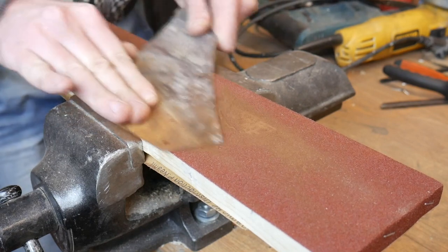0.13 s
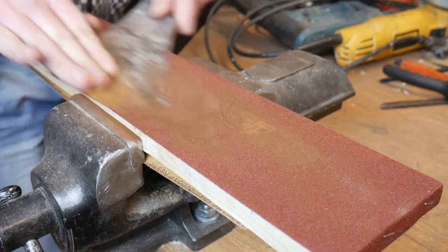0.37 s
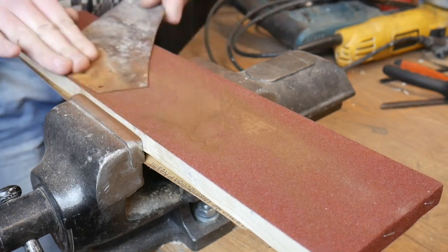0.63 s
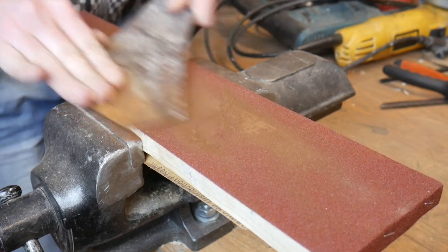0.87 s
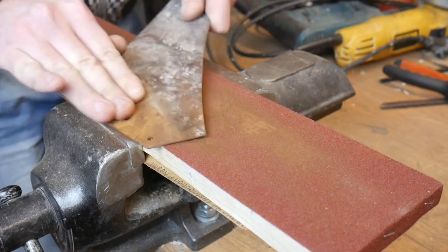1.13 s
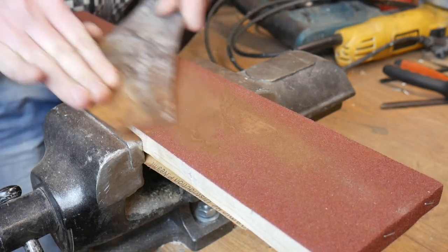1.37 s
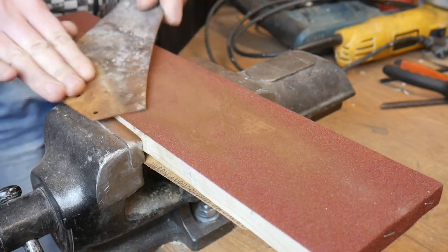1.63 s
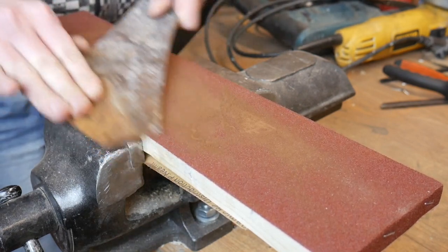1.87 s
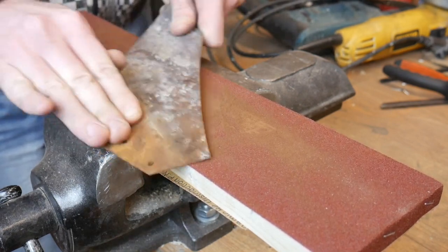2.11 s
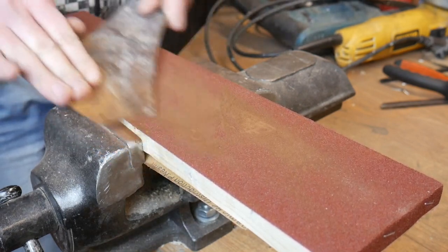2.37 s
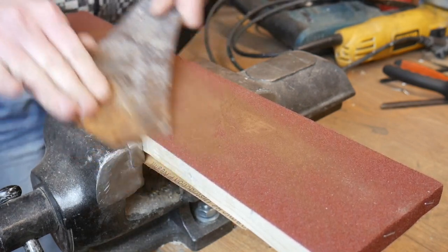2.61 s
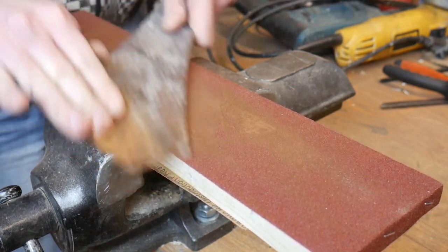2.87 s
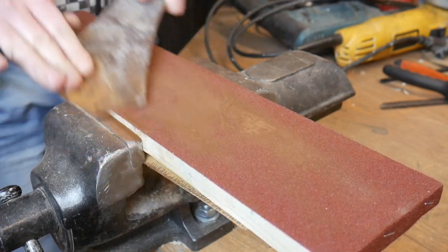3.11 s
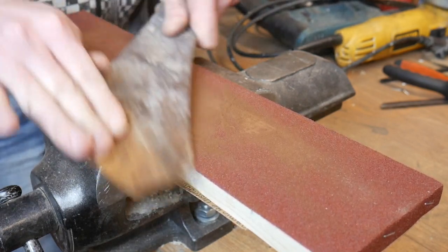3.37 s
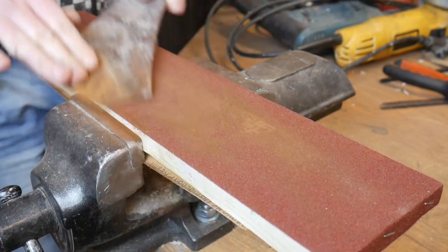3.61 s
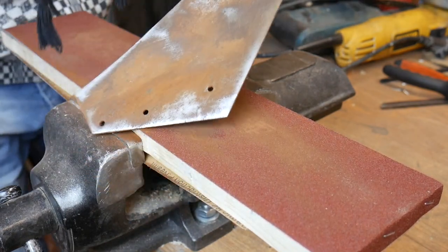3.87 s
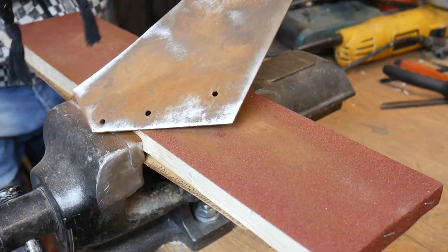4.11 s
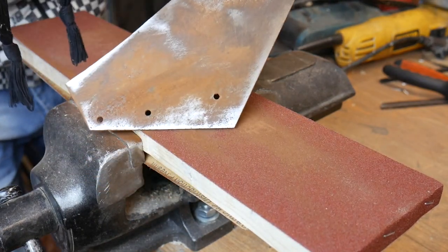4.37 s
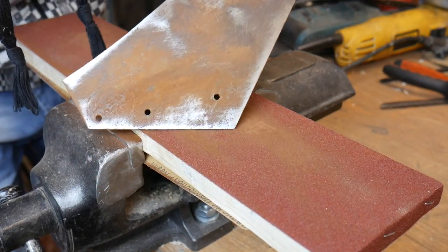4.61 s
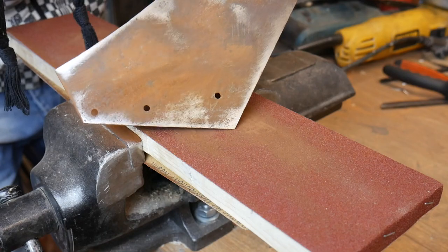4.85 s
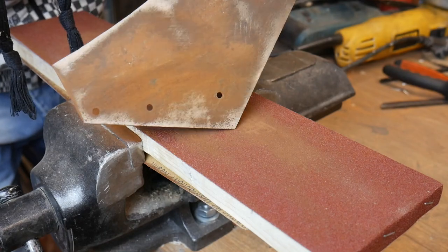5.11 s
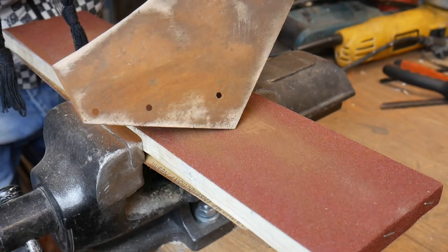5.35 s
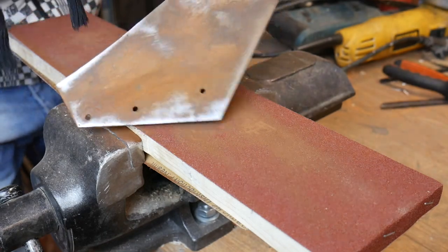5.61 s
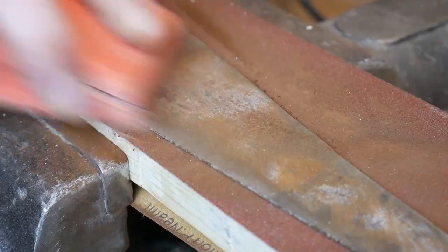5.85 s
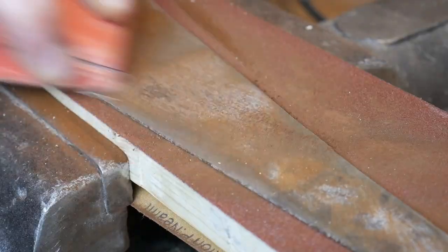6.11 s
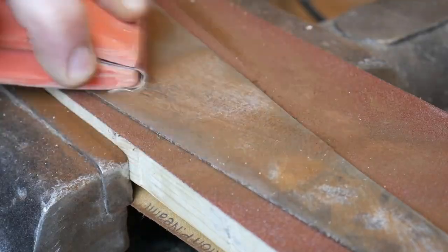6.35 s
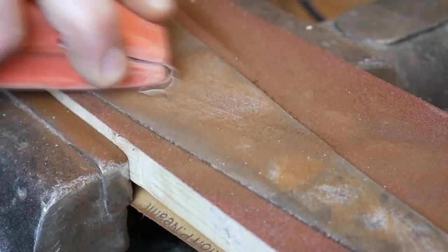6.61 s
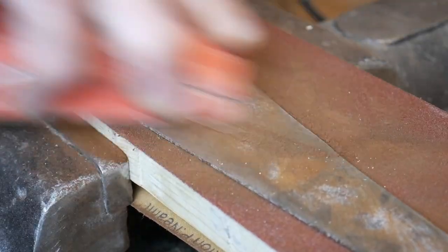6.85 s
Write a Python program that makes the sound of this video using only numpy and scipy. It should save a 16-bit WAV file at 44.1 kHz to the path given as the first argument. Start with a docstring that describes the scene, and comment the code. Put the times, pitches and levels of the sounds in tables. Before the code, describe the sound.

Close up in a small workshop, a rusty saw blade is rubbed quickly to and fro on a sandpaper board, a bright dry rasp with thin steel ring and woody resonance. It breaks off abruptly into quiet handling, a few soft metallic taps and a faint buzz. Just as suddenly a rubber sanding block scrubs the blade in fast, dense strokes until the end. Wide stereo, steady low microphone noise.

```python
"""A rusty saw blade is pushed to and fro over a sandpaper board in a vise: grit clicks ring thin steel and board.
The rasp breaks off into a quiet spell: filtered noise for hands and sleeves, decaying sines for taps of the
lifted blade, and a mains buzz of knocks and rattle that comes and goes.
As abruptly, a rubber sanding block scrubs the blade, again as resonant grit clicks.
A rocking bench and dense stereo reflections lie over steady microphone noise, stronger at the sides."""
import sys
import numpy as np
from scipy import signal
from scipy.fft import rfft, irfft, next_fast_len
from scipy.io import wavfile
from scipy.ndimage import uniform_filter1d

SR = 44100
rng = np.random.default_rng(int(sys.argv[2]) if len(sys.argv) > 2 else 0)


def pcm_store(signal):
    """Save signal as 16-bit PCM."""
    levels = np.round(np.clip(np.atleast_2d(signal), -1, 1) * 32767)
    wavfile.write(sys.argv[1], SR, levels.astype(np.int16).T)


def amplitude_ratio(level_db):
    """Convert a level in decibels to the matching linear amplitude (field) ratio."""
    exponent = np.asarray(level_db, float) / 20
    return 10 ** exponent


N = 307377
TIME = np.arange(N) / SR
SIZE = next_fast_len(N + SR)   # room for filter tails
HZ = np.maximum(np.fft.rfftfreq(SIZE, 1 / SR), 1)
QUIET_FROM_S, QUIET_TO_S = 3.806, 5.766


# blade strokes, pushes and pulls in turn; levels before the trim, lean is the rise from middle to end:
# turn_s, top_db, lean_db, steel_freedom_db, board_freedom_db
BLADE_STROKES = [(-0.09, -22, 4, -5.5, -9), (0.074, -19, 0, -6.5, 0), (0.242, -20.5, -1.5, -4.5, -9),
                 (0.393, -19.5, -3, -2, -11), (0.545, -21.5, 1.5, -13, -8), (0.712, -19.5, 0, -3, -11.5),
                 (0.873, -20.5, 2, 2.5, -7), (1.033, -21, 0, 3, -5.5), (1.207, -21.5, -1.5, 4, 4.5),
                 (1.368, -20, 0.5, 1, 6), (1.534, -21.5, 0, 3, 7.5), (1.692, -19.5, 0.5, -0.5, 9),
                 (1.859, -20.5, 0, 4.5, 10.5), (2.034, -19, 1, 1, 4.5), (2.205, -20, -2.5, 1.5, 9.5),
                 (2.38, -18.5, 3, 2, 4), (2.581, -20, 0, -1.5, 5.5), (2.808, -19, 1.5, 1.5, -4.5),
                 (3.019, -21.5, 1.5, 3.5, 3.5), (3.268, -19.5, 0.5, 5, -1), (3.51, -20, 1.5, 1.5, 2.5),
                 (3.753, -21, -1.5, 0.5, 3)]
# course of a push and of a pull, added to the stroke: share_of_stroke, level_db, steel_db, board_db
BLADE_PUSH = [(0, -22.5, 0, 1.5), (.1, -10, 1.5, 0.5), (.2, -4.5, 2.5, 2), (.39, -1.5, -5.5, -4),
              (.62, -1, 3, -1.5), (.85, -8.5, 2, 3)]
BLADE_PULL = [(0, -22, 0.5, 2.5), (.1, -7.5, 3, 0.5), (.2, -1, 5.5, 5), (0.389, -0.5, -5.5, -6),
              (.62, -2.5, -4.5, 2), (.85, -12, 4, 6.5)]
# colour of the blade's rasp: pitch_hz, relative_level_db
BLADE_RASP = [(53, -67), (90, -37), (461, -25.5), (878, -11), (1040, -15), (1500, -8.5), (2210, -4),
              (2920, -2.5), (9960, -6.5), (15300, -20)]
# modes of the steel and of the board above the rasp: pitch_hz, width_hz, level_db, share_of_grip_change
BLADE_STEEL = [(1964, 71, 2.5, 1.1), (2154, 40, 8, 1.56), (2234, 57, 0.5, 1.1), (3220, 59, 3, 0.28),
               (3390, 20, -1.5, 0.25), (3765, 40, 0.5, .3)]
BLADE_BOARD = [(188, 14, 6.5, .2), (308, 32, 11, 0.22), (553, 49, 2.8, 1.2), (763.4, 12, 6.8, 0.28),
               (875.7, 41, 9.2, 0.9), (921, 19, 1.5, 0.78), (1302, 20, 6.6, 0.33)]


def blade_on_board():
    """The saw blade rubs over the sandpaper board, which rings along with the thin steel."""
    return sanding(BLADE_STROKES, 4.004, (BLADE_PUSH, BLADE_PULL), BLADE_RASP, BLADE_STEEL, BLADE_BOARD,
                   per_s=9000.0, spread_db=1.0, dull=0.56, steady=0.92,
                   patch_db=-9.5, rough_db=0.36, trim_db=-3.5)


# block strokes, pulls and pushes in turn; levels before the trim, lean is the rise from middle to end:
# turn_s, top_db, lean_db, steel_freedom_db, board_freedom_db
BLOCK_STROKES = [(5.72, -21, -2, 0, -8.5), (5.864, -21, 0.32, 0.27, 0), (6.012, -21, -0.25, 0, -6),
                 (6.152, -20, -1.9, -0.44, 0.5), (6.301, -20.5, -0.9, -2.2, -1),
                 (6.436, -20.5, 0.14, -1.5, 2.5), (6.571, -19.5, 1, 0.17, 2),
                 (6.694, -19.5, 0.69, 0.18, -0.5), (6.846, -18.5, 0.52, 0.58, -0.5)]
# course of a pull and of a push, added to the stroke: share_of_stroke, level_db, steel_db, board_db
BLOCK_PULL = [(0, -15, 0, 0), (.09, -4.5, 0, 0), (.19, -0.5, .3, -0.27), (.39, -1, .4, -.2),
              (.62, -4, -.3, .2), (.85, -9, -.4, 0.26)]
BLOCK_PUSH = [(0, -19.5, 0, 0), (.09, -10, 0, 2), (.19, -5, -1, 2.3), (.39, -1.5, 0, -0.11),
              (.62, 0, .3, -1.2), (.85, -4.5, .4, -0.19)]
# colour of the block's rasp: pitch_hz, relative_level_db
BLOCK_RASP = [(53, -50), (90, -26.5), (300, -18.5), (481, -21.5), (772, -10), (1410, -8.5), (2120, -3),
              (4310, -1.5), (10200, -5.5), (15300, -16)]
# modes of the steel and of the board above the rasp: pitch_hz, width_hz, level_db, share_of_grip_change
BLOCK_STEEL = [(2160, 53, -1.5, 2.1)]
BLOCK_BOARD = [(209, 16, 2.7, 0.18), (301, 71, 3.2, 0.66), (579, 115, 3.0, 0.54), (752, 37, 9.8, 1.7),
               (1156, 11, 2, .3)]


def block_on_blade():
    """The rubber block scrubs the blade with denser, more uneven grit."""
    return sanding(BLOCK_STROKES, 6.99, (BLOCK_PULL, BLOCK_PUSH), BLOCK_RASP, BLOCK_STEEL, BLOCK_BOARD,
                   per_s=12000.0, spread_db=2.0, dull=0.095, steady=0.75,
                   patch_db=-7.0, rough_db=0.03, trim_db=-3.0)


def sanding(strokes, end_s, shapes, rasp, steel, board, per_s, spread_db, dull, steady,
            patch_db, rough_db, trim_db):
    """Grit clicks excite the rasp, the free steel, the board and many damped plate modes of wavering strength."""
    level_db, steel_db, board_db, way = stroked(strokes, end_s, shapes)
    level_db = uniform_filter1d(level_db, int(0.011 * SR))   # the hand's inertia rounds the turns
    slow_db = level_db - level_db.max()

    grains = colour(grit(per_s, spread_db), rasp) * amplitude_ratio(rough_db * drift(25.0))
    presence = cut(cut(grains, 2400, "high", order=4), 7000, "low", order=4)
    grains /= np.std(presence)
    low = cut(grains, 710, "low")
    high = cut(grains, 5000, "high")

    # slow rubbing and every second stroke are duller
    treble_db = dull * slow_db + 0.88 * way + 0.63 * drift(7.0)
    # the board rumbles on through the turns
    rumble_db = 0.14 * board_db - steady * slow_db
    rubbed = grains + (amplitude_ratio(treble_db) - 1) * high + (amplitude_ratio(rumble_db) - 1) * low

    plate_modes_hz = np.geomspace(1000, 13000, 44) * rng.uniform(0.97, 1.03, 44)
    for hz in plate_modes_hz:
        rubbed += resonate(grains * amplitude_ratio(patch_db + 6 * drift(9)), hz, 25 + 0.008 * hz)

    push = amplitude_ratio(level_db + trim_db)
    steel_ring = gripped(grains * push * amplitude_ratio(0.22 * slow_db), steel, steel_db, waver_db=4.5)
    board_ring = gripped(grains * push, board, board_db, waver_db=4.0)
    return rubbed * push + steel_ring + board_ring


def stroked(strokes, end_s, shapes):
    """Level, steel and board freedom and direction along the strokes, which take the two shapes in turn."""
    turns, top_db, lean_db, steel_db, board_db = np.array(strokes).T[:, :, None]
    which = np.arange(len(strokes)) % 2
    share, level, steel, board = np.moveaxis(np.array(shapes)[which], 2, 0)
    lengths = np.diff(np.append(turns, end_s))[:, None]   # end_s is where the last stroke would turn
    s = turns + lengths * share
    way = 1 - 2 * which[:, None] + 0 * share
    columns = top_db + level + lean_db * (2 * share - 1), steel_db + steel, board_db + board, way
    return [np.interp(TIME, s.ravel(), c.ravel()) for c in columns]


def grit(per_s, spread_db):
    """Grains catch and let go at random, a few much harder than the rest."""
    sizes = amplitude_ratio(spread_db * np.minimum(rng.exponential(1, N), 5)) * rng.choice([-1, 1], N)
    caught = rng.random(N) < per_s / SR
    return rms_one(sizes * caught)


def gripped(x, modes, grip_db, waver_db):
    """Modes that the hands damp or set free, each wavering a little on its own."""
    out = 0
    for hz, width, db, follow in modes:
        gain_db = db + follow * grip_db + waver_db * drift(9.9)
        out = out + resonate(x * amplitude_ratio(gain_db), hz, width)
    return out


# the blade touches the board or vise: start_s, tick_db, ring_db, tilt_db_per_octave, share_of_free_ring_time
TAPS = [(3.919, -42, -45.5, 1.5, 0.62), (4.114, -60, -55, -8, 0.33), (4.189, -51, -50, 0, 0.24),
        (4.523, -45, -67, -6.5, 0.42), (4.592, -52, -80, 0.1, .4), (5.47, -85, -80, -10.5, 1.2),
        (5.566, -50, -60.5, -3.5, 0.69), (5.588, -56, -54.5, 37, 1.1)]
# modes of the free blade: pitch_hz, level_db, t60_s
FREE_BLADE = [(1135, 2, 0.66), (1580, -15, 0.36), (858, 1, 0.27), (302, -1, 0.25)]


def taps():
    """A short scratchy tick, and the blade rings as long as the fingers let it."""
    rows = np.array(TAPS)
    starts = (rows[:, 0] * SR).astype(int)
    ticks = np.full(N, 1e-18)
    ticks[starts] = amplitude_ratio(rows[:, 1])
    fade = signal.lfilter([1], [1, -np.exp(-1 / (0.008 * SR))], ticks)
    out = uniform_filter1d(fade, int(0.0027 * SR)) * rms_one(colour(rng.standard_normal(N), HISS))
    for start, (s, tick_db, ring_db, tilt_db, free) in zip(starts, rows):
        t = TIME[:min(SR // 2, N - start)]
        onset = 1 - np.exp(-t / 0.0051)
        for hz, level_db, t60 in FREE_BLADE:
            tilted_db = tilt_db * np.log2(hz / FREE_BLADE[0][0])
            gain_db = ring_db + level_db + tilted_db - 60 * t / (t60 * free)
            out[start:start + len(t)] += amplitude_ratio(gain_db) * onset * np.sin(2 * np.pi * hz * t)
    return out


# steady hold of the blade, before the flutter: time_s, hiss_db, wobble_db
HANDLING = [(3.83, -53, -71), (4.04, -54, -67), (4.2, -55.5, -61), (4.41, -66, -77), (4.65, -68.5, -73.5),
            (4.72, -74, -74), (5.545, -78.5, -87)]
# the fingers take a new hold, before the flutter: time_s, hiss_db, wobble_db
GRABS = [(3.925, -49.5, -46.5), (4.088, -51, -53), (4.115, -54, -46.5), (4.16, -54.5, -58),
         (4.195, -65, -58), (4.305, -56, -51), (4.455, -64, -81), (4.575, -63, -80), (5.585, -52, -67),
         (5.645, -59.5, -49.5), (5.70, -72, -64)]
# colour of skin and sleeves, and of the tap ticks: pitch_hz, relative_level_db
HISS = [(530, -17.5), (900, -2.5), (1040, -17.5), (1140, -5), (1280, -6), (7600, -7.5), (9640, -14.5),
        (15300, -27.5)]
# resonances of the held steel in the hiss: pitch_hz, width_hz, level_db
SHIMMER = [(2560, 120, -2.5), (4170, 300, -9.5), (9900, 720, 3.5)]
# low modes of the wobbling steel: pitch_hz, width_hz, relative_level_db
WOBBLE = [(352, 140, -2.5), (473, 86, 5), (580, 64, -9), (853, 51, -8)]


def handling():
    """Sleeves and skin hiss dully, each new hold scuffs brighter, and the steel wobbles low."""
    rise_s, scuff_fall_s, wobble_fall_s = 0.0062, 0.026, 0.03
    slide, shake = amplitude_ratio(np.array(in_time(HANDLING)))
    scuff = swells(GRABS, rise_s, scuff_fall_s)[0]
    shake = shake + swells(GRABS, rise_s, wobble_fall_s)[1]
    hiss = rms_one(colour(grit(9000.0, 2.0), HISS))
    hiss += body(hiss, SHIMMER)
    dull = cut(hiss, 7300, "low")
    bright = hiss + amplitude_ratio(1.5) * cut(hiss, 7200, "high")
    wobble = rms_one(body(cut(rng.standard_normal(N), 1200, "low"), WOBBLE))
    rubbing = (dull * slide + bright * scuff) * amplitude_ratio(1.7 * drift(30.0))
    return rubbing + wobble * shake * amplitude_ratio(1.7 * drift(25.0))


# the buzz comes and goes, silent outside these times: time_s, level_db
BUZZ = [(4.3, -71.5), (4.65, -69.5), (5.09, -71.5), (5.25, -90)]
# modes of the loose part, the first knocked, the others rattled: pitch_hz, width_hz, level_db
BUZZ_BOX = [(1330, 91, -5.5), (2680, 170, 4), (3060, 180, -6)]


def buzz():
    """Once a mains cycle something loose is knocked almost evenly; its higher modes also rattle."""
    mains_hz, first_s = 50.04, 4.317
    cycle = (TIME - first_s) * mains_hz
    strengths = amplitude_ratio(rng.normal(0, 1.5, int(N / SR * mains_hz) + 2))
    strength = strengths[np.clip(cycle.astype(int), 0, None)]
    knock = strength * (np.diff(np.floor(cycle), prepend=cycle[0]) > 0.5)
    rattle = strength ** 2 * 0.076 * np.exp(-(cycle % 1) / 0.21) * rng.standard_normal(N)
    struck = resonate(knock, BUZZ_BOX[0][0], 400) * 3 + 1e-18
    sound = body(struck, BUZZ_BOX[:1]) + body(rattle, BUZZ_BOX[1:])
    on = (TIME > BUZZ[0][0]) & (TIME < BUZZ[-1][0])
    return on * amplitude_ratio(in_time(BUZZ)[0]) * rms_one(cut(sound, 3650, "low", order=4))


# hard turns and set-downs jolt the bench: time_s, level_db
JOLTS = [(0.28, -59), (0.75, -55), (1.2, -54), (1.9, -62), (2.07, -65), (2.24, -57), (2.85, -59),
         (3.96, -59), (4.2, -70.5), (4.58, -82), (5.91, -55), (6.47, -57), (6.76, -55)]


def bench():
    """The bench rocks at its low resonance, while sanding goes on and about each jolt."""
    pitch_hz, width_hz = 67.0, 8.0
    sanded_db, still_db = -66.5, -96
    once = resonate(rng.standard_normal(N), pitch_hz, width_hz)
    rocking = rms_one(resonate(once, pitch_hz, 4.7 * width_hz))
    still = (TIME >= QUIET_FROM_S) & (TIME < QUIET_TO_S)
    gain = amplitude_ratio(np.where(still, still_db, sanded_db)) + swells(JOLTS, rise_s=0.054, fall_s=0.094)[0]
    return gain * rocking


def workshop(x, t60):
    """Dense reflections: two noise tails of unit energy that trade places as hands and steel move about."""
    tails = rng.standard_normal((2, SR // 2)) * amplitude_ratio(-60 * np.arange(SR // 2) / SR / t60)
    tails /= np.linalg.norm(tails, axis=1, keepdims=True)
    turn = 2 * np.pi * 1.3 * TIME + 2 * drift(2)
    moved = x * np.array([np.cos(turn), np.sin(turn)])
    return irfft(rfft(moved, SIZE) * rfft(tails, SIZE), SIZE)[:, :N].sum(axis=0)


# width of the reflections, before each passage's own width gain: pitch_hz, side_level_db
WIDTH = [(60, -8), (130, -5.5), (290, -11.5), (640, -9), (1410, -7), (3100, -12.5), (6820, -22.5),
         (15000, 0)]


def side_reflections(x, wide_db):
    """Short reflections that reach the two ears in opposite phase widen the image."""
    return amplitude_ratio(wide_db) * colour(workshop(x, t60=0.12), WIDTH)


# colour of the microphone noise in the centre and at the sides: pitch_hz, relative_level_db
NOISE_MID = [(18, -41.5), (30, -17), (140, -13), (202, -5), (307, -8), (332, -9), (546, -10), (2020, -17),
             (15500, -20)]
NOISE_SIDE = [(18, -53), (30, -20.5), (341, -5.5), (575, -10), (709, -11.5), (787, -12), (3150, -29),
              (4090, -28.5), (15500, -42)]


def mic_noise():
    """Steady coloured microphone noise, one for the centre and a stronger one for the sides."""
    mid = amplitude_ratio(-70) * rms_one(colour(rng.standard_normal(N), NOISE_MID))
    side = amplitude_ratio(-62.5) * rms_one(colour(rng.standard_normal(N), NOISE_SIDE))
    return mid, side


# balance of the centre: pitch_hz, left_minus_right_db
LEAN = [(300, .8), (800, .9), (2400, -1.6), (4400, -.2), (8000, -.1), (15000, -1.3)]


def left_right(mid, side):
    """The centre leans left or right by pitch; the sides go in opposite phase to the two channels."""
    lean = np.array(LEAN) * [1, 0.5]   # half the difference to each channel
    return np.array([colour(mid, lean) + side, colour(mid, lean * [1, -1]) - side])


def rms_one(x):
    """Scale to rms 1."""
    return x / np.sqrt(np.mean(x ** 2) + 1e-20)


def in_time(rows):
    """Columns of a table, one value a sample."""
    s, *columns = np.transpose(rows)
    return [np.interp(TIME, s, c) for c in columns]


def swells(rows, rise_s, fall_s):
    """Each event swells and dies exponentially about its time; one gain a sample for each dB column."""
    s, *columns = np.transpose(rows)
    late = TIME[::32, None] - s
    shape = np.exp(np.where(late < 0, late / rise_s, -late / fall_s))
    return [np.interp(TIME, TIME[::32], shape @ amplitude_ratio(db)) for db in columns]


def drift(rate_hz):
    """Slow chance, spread 1."""
    r = np.exp(-80 * np.pi * rate_hz / SR)   # computed every 40th sample
    slow = signal.lfilter([1], [1, -2 * r, r * r], rng.standard_normal(N // 40 + 2002))[2000:]
    return np.interp(np.arange(N) / 40, np.arange(len(slow)), rms_one(slow))


def at_hz(points, hz):
    """A spectrum read on a log axis."""
    pitch_hz, level_db = np.array(points).T
    return np.interp(np.log(hz), np.log(np.maximum(pitch_hz, 1)), level_db)


def colour(x, points):
    """Filter by a spectrum in dB."""
    return irfft(rfft(x, SIZE) * amplitude_ratio(at_hz(points, HZ)), SIZE)[:N]


def cut(x, hz, kind, order=2):
    """Low- or high-pass."""
    return signal.sosfilt(signal.butter(order, hz, kind, fs=SR, output="sos"), x)


def resonate(x, hz, width_hz):
    """One resonance, gain about 1 on top."""
    r = np.exp(-np.pi * width_hz / SR)
    poles = [1, -2 * r * np.cos(2 * np.pi * hz / SR), r * r]
    return signal.lfilter([(1 - r * r) / 2, 0, (r * r - 1) / 2], poles, x)


def body(x, peaks):
    """Resonances in parallel."""
    return sum(amplitude_ratio(db) * resonate(x, hz, width) for hz, width, db in peaks)


def scene():
    """Blade, quiet spell and block follow abruptly, each with its reflections, over bench and microphone noise."""
    first = TIME < QUIET_FROM_S
    last = TIME >= QUIET_TO_S
    quiet = ~first & ~last
    in_hand = (handling() + taps() + buzz()) * quiet
    passages = np.array([blade_on_board(), in_hand, block_on_blade()]) + bench()
    mid, side = mic_noise()
    for passage, on, wide_db in zip(passages, (first, quiet, last), (-1.1, 6.0, -1.2)):
        mid = mid + on * (passage + amplitude_ratio(-11.5) * workshop(passage, t60=0.33))
        side = side + on * side_reflections(passage, wide_db)
    return left_right(mid, side)


def roll_off(x):
    """The treble ends steeply here."""
    return signal.sosfilt(signal.butter(12, 15890, fs=SR, output="sos"), x)


def record(dry):
    """A steep low-pass takes off the top of the mix."""
    low_pass = signal.cheby2(12, 50, 15750, fs=SR, output="sos")
    mix = signal.sosfilt(low_pass, dry)
    return roll_off(mix)


dry = scene()
out = record(dry)
pcm_store(out)
```